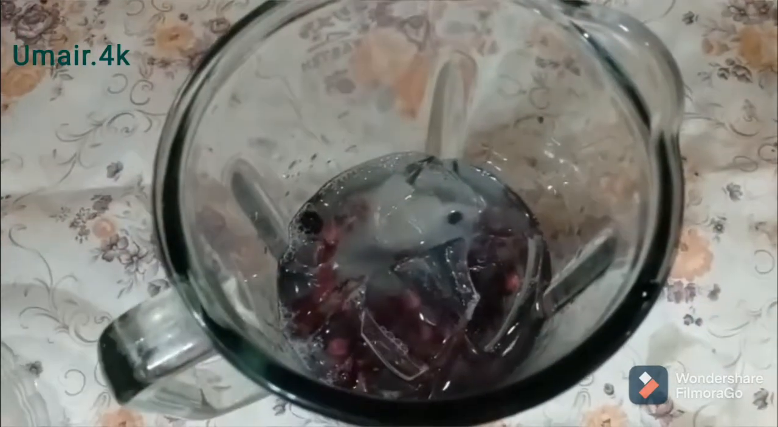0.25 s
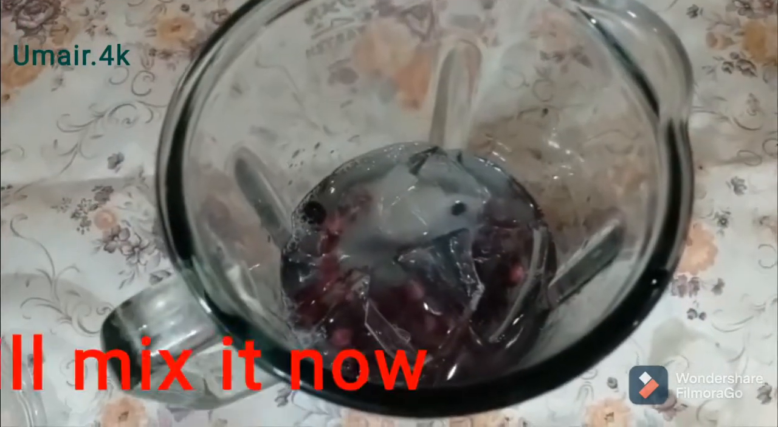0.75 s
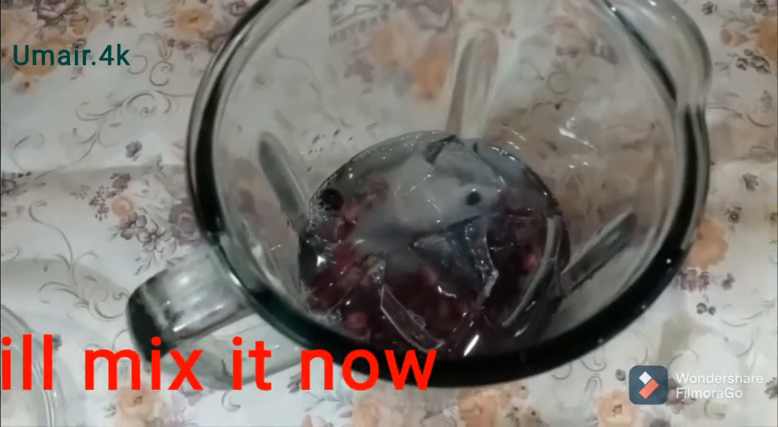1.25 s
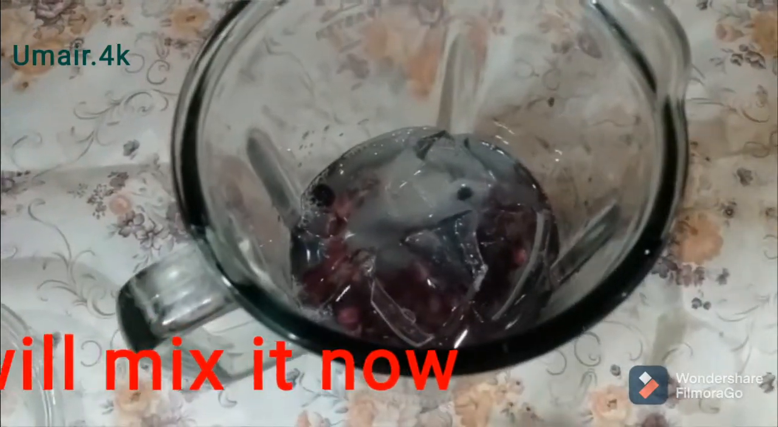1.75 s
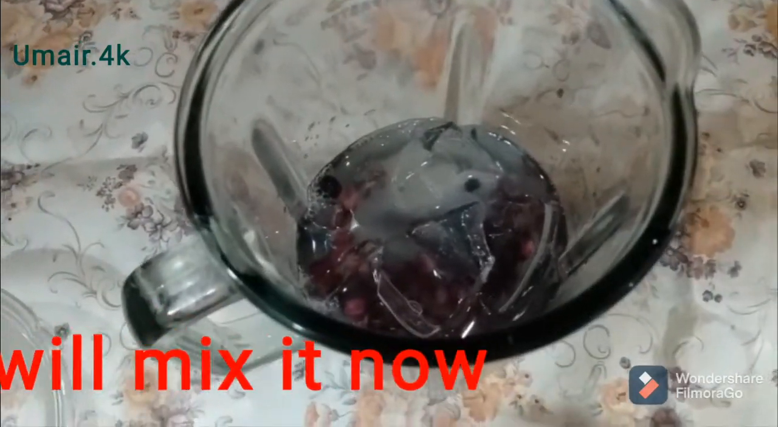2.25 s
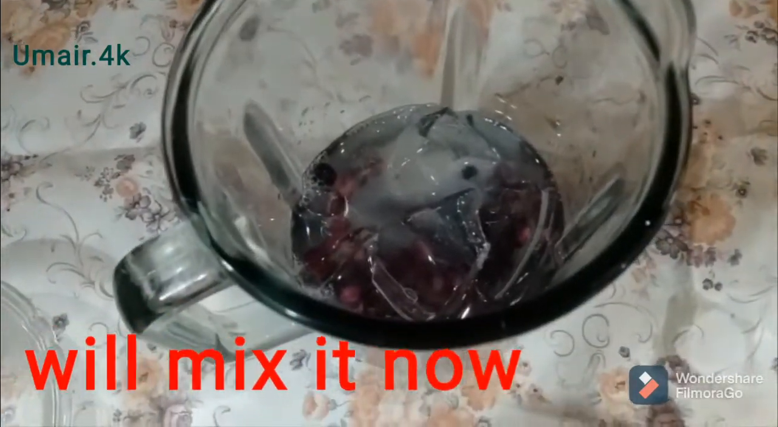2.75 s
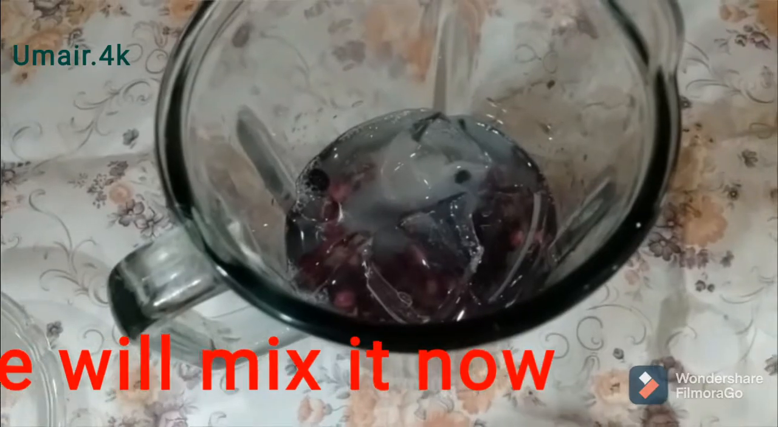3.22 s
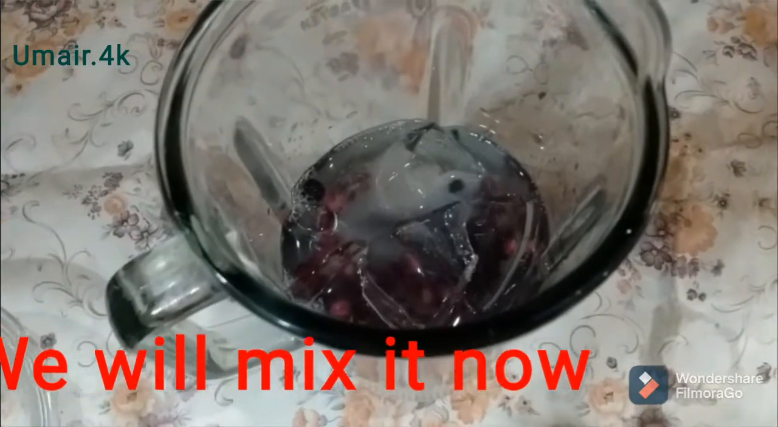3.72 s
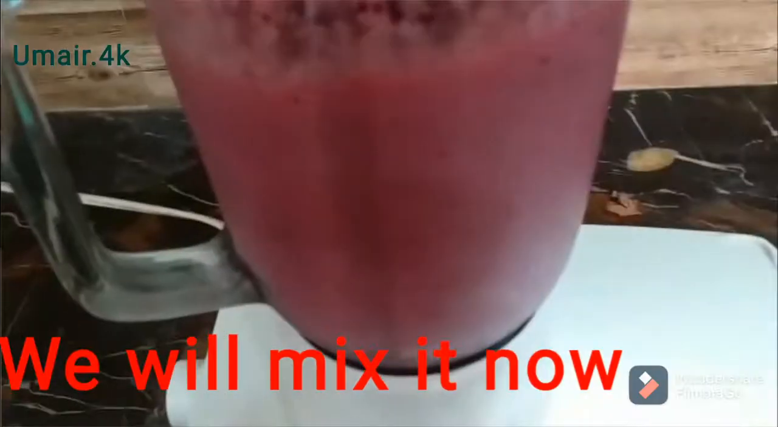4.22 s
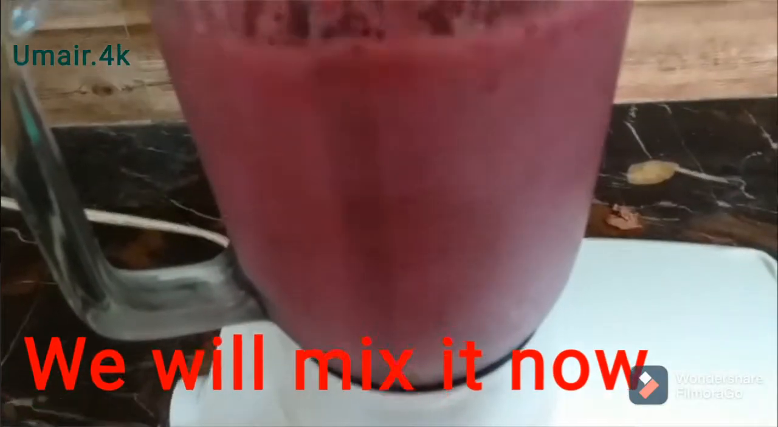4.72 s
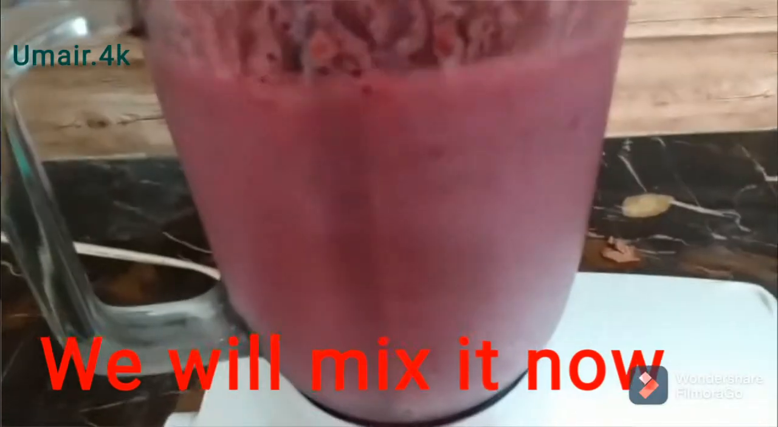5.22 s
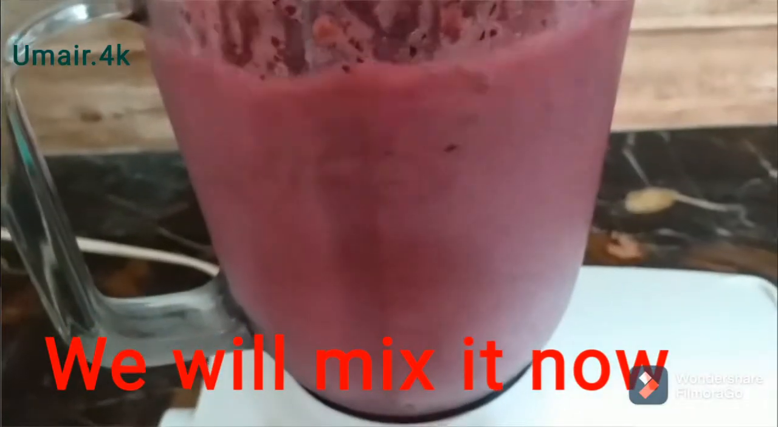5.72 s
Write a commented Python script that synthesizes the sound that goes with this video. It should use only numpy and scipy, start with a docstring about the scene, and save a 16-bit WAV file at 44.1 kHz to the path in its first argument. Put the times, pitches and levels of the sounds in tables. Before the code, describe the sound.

A quiet kitchen with faint distant bird chirps, then an electric blender suddenly runs at full speed, rattling ice and churning fruit.

```python
"""A quiet kitchen hums; over it come a distant bird, two soft bumps, a faint squeak and a brief high hiss.
After a blink of silence a glass-jar blender is running close by at full speed. Its motor hums on the
shaft orders and sags as gulps of pulp fall on the blades. Bits of ice and fruit rattle against the
ringing jar, the pulp heaves in the bass and the jar throbs on its base."""
import sys
import numpy as np
from scipy import signal
from scipy.fft import rfft, irfft, next_fast_len
from scipy.io import wavfile

SR = 44100
rng = np.random.default_rng(int(sys.argv[2]) if len(sys.argv) > 2 else 0)


def transcribe(signal):
    """Save signal, clipped to [-1, 1], as a 16-bit WAV file at the path in sys.argv[1]."""
    frames = np.atleast_2d(signal).T
    limited = np.clip(frames, -1, 1)
    pcm = np.round(limited * 32767).astype(np.int16)
    wavfile.write(sys.argv[1], SR, pcm)


N = 263277
T = np.arange(N) / SR


def undb(db):
    """Decibels to gain."""
    return 10 ** (np.asarray(db) / 20)


def level(x, db):
    """Scale to an rms level."""
    return x * undb(db) / np.sqrt(np.mean(x ** 2))


def peak_level(x, db):
    """Scale to a peak level."""
    return x * undb(db) / np.abs(x).max()


def ramp(start_s, length_s):
    """An envelope that rises from 0 to 1 and stays there."""
    return np.clip((T - start_s) / length_s, 0, 1)


def burst(start_s, decay_s):
    """An envelope that jumps to 1 and dies away."""
    return (T >= start_s) * np.exp(-np.maximum(T - start_s, 0) / decay_s)


def walk(rate):
    """Smooth random drift of unit rms, changing about rate times a second."""
    size = next_fast_len(N, real=True)
    f = np.arange(size // 2 + 1) * SR / size
    spectrum = rfft(rng.standard_normal(size)) * np.exp(-(f / rate) ** 2)
    return level(irfft(spectrum, size)[:N], 0)


def tone(cycles, db):
    """A sine at an rms level, its phase counted in cycles."""
    return np.sqrt(2) * undb(db) * np.sin(2 * np.pi * cycles)


def cut(x, kind, hz, order):
    """Butterworth low-pass or high-pass."""
    return signal.sosfilt(signal.butter(order, hz, kind, fs=SR, output="sos"), x)


def through(x, response):
    """Pass a sound through an impulse response."""
    return signal.fftconvolve(x, response)[:N]


def colour(points, resonances=(), size=SR // 2):
    """Impulse response of an EQ curve (frequency [Hz], gain [dB]) with resonances standing on it."""
    hz, db = np.transpose(points)
    f = np.maximum(np.arange(size // 2 + 1) * SR / size, 1)
    peaks_db = sum(lift / (1 + (2 * (f - centre) / width) ** 2) for centre, width, lift in resonances)
    curve_db = np.interp(np.log(f), np.log(hz), db)
    cepstrum = irfft(np.log(undb(curve_db + peaks_db)))
    # minimum phase: nothing rings ahead of the hit
    cepstrum[1:size // 2] *= 2
    cepstrum[size // 2 + 1:] = 0
    return irfft(np.exp(rfft(cepstrum)))


def noise(points):
    """Noise of unit rms, shaped by an EQ curve."""
    return level(through(rng.standard_normal(N), colour(points)), 0)


def ring(modes):
    """Impulse response of damped modes: the narrower the mode, the longer it rings."""
    t = T[:SR // 2]
    return sum(undb(db) * 2 * np.pi * width / SR * np.exp(-np.pi * width * t) * np.sin(2 * np.pi * hz * t)
               for hz, width, db in modes)


def kitchen(x, t60_s, wet_db):
    """Direct sound plus a short tail from worktop and walls."""
    t = T[:SR // 2]
    tail = rng.standard_normal(len(t)) * np.exp(-np.log(1000) * t / t60_s) * (t > .002)
    return x + undb(wet_db) * through(x, tail / np.linalg.norm(tail))


def room_tone():
    """The bed: an even rush with a mains hum, a thin whine and a sinking upper hiss."""
    # spectrum of the rush (frequency [Hz], relative level [dB])
    rush_eq = [(30, -19), (50, -14), (80, 4), (100, 0), (125, -3.5), (165, -0.5), (215, -8.5), (310, -4.5),
               (570, -6.5), (900, -11.5), (1500, -13), (3400, -24), (5200, -50.5), (6700, -51.5),
               (9000, -53.5), (15500, -45.5)]
    # fade of the upper hiss (time [s], level [dB])
    air_fade = [(0, -61), (3.2, -64), (3.5, -68)]
    # hum and whine (frequency [Hz], level [dB])
    steady_tones = [(99.3, -52), (4126.6, -74)]
    rush = noise(rush_eq) * undb(-43)
    air_db = np.interp(T, *np.transpose(air_fade))
    air = noise([(2500, -11), (4200, 6.5), (5100, -1), (6300, -26), (8000, -56)]) * undb(air_db)
    return rush + air + sum(tone(hz * T, db + 2 * walk(5)) for hz, db in steady_tones)


def hiss(rise_s=0.059, fall_s=0.041):
    """A faint, very high hiss that flutters as it swells and fades a few times."""
    # swells (time of the peak [s], level [dB])
    swells = [(.54, -64), (2.4, -78), (2.79, -52), (3.5, -78)]
    envelope = sum(undb(db) * np.exp(-np.maximum((s - T) / rise_s, (T - s) / fall_s)) for s, db in swells)
    return noise([(5000, -30), (9500, -26), (12500, -7), (15000, 2)]) * envelope * undb(2 * walk(60))


def bird(length_s=0.055, from_hz=4450, to_hz=5100, rasp_hz=857, clear_db=-64, hoarse_db=-54.5):
    """A small bird outside: rising chirps whose pitch shakes more when loud, dulled by the window."""
    # chirps (time [s], level outside the window [dB])
    chirps = [(.071, -61), (0.281, -54.5), (0.495, -51), (0.715, -55), (.908, -55.5), (1.13, -63),
              (1.371, -60.5), (1.62, -63), (1.87, -60.5), (2.11, -64)]
    out, shake = np.zeros(N), walk(760)
    progress = np.linspace(0, 1, int(length_s * SR))
    arch = np.sqrt(np.abs(np.sin(np.pi * progress)))
    for s, db in chirps:
        span = slice(int(s * SR), int(s * SR) + len(progress))
        hoarseness = np.interp(db, [clear_db, hoarse_db], [.1, 1])
        hz = from_hz + (to_hz - from_hz) * progress + hoarseness * rasp_hz * shake[span]
        out[span] += arch * tone(np.cumsum(hz) / SR, db)
    return kitchen(cut(out, "low", 4920, order=6), t60_s=0.32, wet_db=-2)


def squeak(start_s=.728, decay_s=0.06, attack_s=0.0064):
    """A faint, rough squeak: noise ringing in narrow modes, quick to swell and fade."""
    # resonances of the squeak (frequency [Hz], width [Hz], relative level [dB])
    modes = [(663, 8.9, 4), (1350, 54, -12), (1995, 55, -8), (2623, 55, -5.5)]
    rasp = cut(through(rng.standard_normal(N), ring(modes)), "low", 2900, order=6)
    return level(rasp, -38.5) * (burst(start_s, decay_s) - burst(start_s, attack_s))


def bumps(rebounds=3, rebound_hz=118, rebound_db=-3):
    """Handling bumps with dull, ever weaker rebounds; a softer contact reaches fewer high modes."""
    # knocks (time [s], relative push [dB], brightness [Hz], gap between rebounds [s])
    knocks = [(.181, -24, 1300, .041), (0.51, -25, 278, 0.05)]
    # resonances of the bumped body (frequency [Hz], width [Hz], relative level [dB])
    modes = [(61, 4.7, 4), (78.7, 8.2, 13.5), (103, 14, 5), (161, 28, -2), (210, 99, -3.5), (401, 17, -5),
             (551, 35, -0.5), (940, 55, -10), (1000, 55, -6.5), (1120, 130, -22)]
    force = np.zeros(N)
    for s, db, bright_hz, gap_s in knocks:
        for k in range(rebounds + 1):
            push = np.zeros(N)
            push[int((s + k * gap_s) * SR)] = undb(db + k * rebound_db)
            force += cut(push, "low", rebound_hz if k else bright_hz, order=2)
    return kitchen(through(force, peak_level(ring(modes), 7)), t60_s=0.21, wet_db=1.0)


def pulp_load(attack_s=.025, release_s=.04):
    """The vortex collapses and pulp falls on the blades: each gulp builds, holds and drains away."""
    # gulps (time [s], length [s], strength [0-1])
    gulps = [(3.92, 0.045, 0.6), (4.19, 0.043, 0.77), (4.357, .05, 0.74), (4.62, 0.052, .9),
             (4.705, 0.064, 0.65), (4.892, 0.076, 0.77), (5.115, 0.053, 1), (5.325, .07, 0.7),
             (5.599, 0.1, 1), (5.76, 0.057, 1), (5.853, 0.067, 0.57)]
    return sum(strength * ramp(s, attack_s) * np.exp(-np.maximum(T - s - length, 0) / release_s)
               for s, length, strength in gulps)


def whine(hz=1192, db=-38.5):
    """An unsteady whine just under the motor's sixth order."""
    cycles = np.cumsum(hz + 8 * walk(14.8)) / SR
    return tone(cycles, db + 2 * walk(14))


def rocking(load, hz=149.8, wander_hz=8.85, throb_hz=15.0, throb_depth=0.59):
    """The jar shakes on its base: a low, throbbing drone that wanders and grows a little under load."""
    cycles = np.cumsum(hz + wander_hz * walk(31.9)) / SR
    throb_cycles = np.cumsum(throb_hz * (1 + 0.146 * walk(4.7))) / SR
    throb = 1 + throb_depth * np.sin(2 * np.pi * throb_cycles)
    return throb * tone(cycles, -32 + 0.5 * load + 1.4 * walk(9.8))


def motor(turns, waver_db=2.0):
    """The motor hums at multiples of its shaft speed, each wavering in level on its own."""
    # partials of the hum (shaft order [cycles per turn], level [dB])
    partials = [(1, -39), (2, -44), (3, -43), (4, -46), (6, -35.5), (9, -46), (12, -50.5)]
    hum = np.zeros(N)
    for order, db in partials:
        wavering_db = db + waver_db * walk(19)
        hum += tone(order * turns + rng.random(), wavering_db)
    return hum


def grit(turns, per_s, spread_db, bunching, surge_db):
    """Small random hits on the blades, surging in level and bunched at one point of each turn."""
    chance = per_s / SR * (1 + bunching * np.cos(2 * np.pi * turns))
    size = undb(spread_db * np.minimum(rng.exponential(size=N), 4)) * rng.choice([-1, 1], N)
    hits = rng.random(N) < chance
    return level(hits * size * undb(surge_db * walk(57)), 0)


def slosh(turns, load, rest_db=-36, lift_db=8.5):
    """The vortex slaps the pulp about: a bass heave that swells with each gulp."""
    # spectrum of the heaving pulp (frequency [Hz], relative level [dB])
    pulp_eq = [(35, -59), (60, -4), (90, -5), (125, 2), (185, 0), (240, 4), (330, 1), (450, -6.5),
               (800, -17), (2000, -60)]
    slaps = grit(turns, per_s=900, spread_db=5.0, bunching=.2, surge_db=0.5)
    return level(through(slaps, colour(pulp_eq)), 0) * undb(rest_db + lift_db * load)


def ice_chunks(jar, crumble_s=0.0067, shards_s=0.026, click_db=-23, scatter_db=3):
    """Each chunk crumbles into a brief shower of shards, rings the jar and clicks on the glass."""
    # blade strikes on ice (time [s], peak before the low cut [dB])
    strikes = [(3.9848, -10), (4.0841, -13), (4.1126, -10), (4.2298, -6), (4.2732, -10), (4.3206, -8),
               (4.3565, -7), (4.3974, -9), (4.4643, -8), (4.5845, -12), (4.6364, -11), (4.6754, -11),
               (4.7157, -9), (4.7631, -9), (4.7875, -5), (4.8744, -10), (4.9427, -8), (4.9884, -8),
               (5.0414, -10), (5.1367, -5), (5.1524, -9), (5.1716, -6), (5.2689, -9), (5.4166, -7),
               (5.5223, -9), (5.5474, -10), (5.5967, -7), (5.6221, -10), (5.672, -10), (5.7024, -6),
               (5.7683, -9), (5.8501, -7), (5.9344, -9)]
    glass = colour([(3000, -27), (9000, -14), (12000, -3), (15000, 20)])
    out, t = np.zeros(N + SR), T[:SR // 10]
    for s, db in strikes:
        crumble = rng.standard_normal(len(t)) * np.exp(-t / crumble_s)
        shards = rng.standard_normal(len(t)) * np.exp(-t / shards_s) * undb(-14.5)
        knock = peak_level(signal.fftconvolve(crumble + shards, jar), db)
        knock = cut(knock, "high", 1310, order=1)  # hard, light ice hardly moves the low modes
        click = signal.fftconvolve(crumble * np.abs(crumble), glass)  # the hardest contacts click most
        click = peak_level(click, db + click_db + scatter_db * rng.standard_normal())
        start = int(s * SR)
        out[start:start + len(knock)] += knock + click
    return out[:N]


def rattle(turns, drive_db):
    """Countless bits and a few ice chunks ring the jar; seeds tick against the glass between them."""
    # dry crack of a bit on blade or glass (frequency [Hz], relative level [dB])
    crack_eq = [(60, -60), (200, 2), (420, 3), (700, 5.5), (1050, 2.5), (1400, 5), (2100, 8.5), (2650, 3),
                (3200, -3), (4100, 1), (5900, -10.5), (6600, -20), (8700, -33), (15600, -13)]
    # ringing resonances of the jar, plus a slight peak near the whine's pitch
    # (frequency [Hz], width [Hz], lift [dB])
    mid_peaks = [(803, 14, 5), (835, 18, 7), (1177, 20, 3), (1526, 26, 6), (1672, 70, 7), (1890, 70, 12),
                 (1962, 50, 9.5), (2177, 40, 5), (2305, 25, 3), (2443, 40, 8)]
    # treble resonances of the bare glass wall (frequency [Hz], width [Hz], lift [dB])
    glass_modes = [(3555, 310, 6.5), (3795, 65, 5.5), (4230, 23, 2.5), (4300, 22, -5), (4610, 30, 4),
                   (5170, 50, 4.5), (5800, 160, 7), (8370, 160, 5.5)]
    jar = colour(crack_eq, mid_peaks + glass_modes)
    jar /= np.linalg.norm(jar)
    tick = colour([(3000, -20), (7000, -21), (8300, -9), (9500, -9.5), (15000, -30)])
    bits = grit(turns, per_s=3800, spread_db=1, bunching=.2, surge_db=2) * undb(drive_db)
    seeds = grit(turns, per_s=90, spread_db=8, bunching=.29, surge_db=2) * undb(drive_db - 19.5)
    return through(bits, jar) + through(seeds, tick) + ice_chunks(jar)


def blender(free_hz=204.55, sag_hz=2.3, drag_hz=1.8, inertia_s=0.088):
    """Gulps of pulp slow the motor, push up the rattle in the jar and heave in the bass."""
    load = pulp_load()
    grip = ramp(4.14, 0.014)  # the blades catch the fruit
    drag = ramp(5.63, 0.21)  # the mix drags on the shaft
    sag = cut(load, "low", 1 / (2 * np.pi * inertia_s), order=1)
    shaft_hz = free_hz - sag_hz * sag - drag_hz * drag
    turns = np.cumsum(shaft_hz * (1 + .0042 * walk(30))) / SR
    contents = rattle(turns, drive_db=-27 + 3 * grip + 2 * load) + slosh(turns, load)
    churn = kitchen(contents, t60_s=0.21, wet_db=-9.5)
    return churn + grip * rocking(load) + motor(turns) + drag * whine()


def scene(room_ends_s=3.948, blender_starts_s=3.979):
    """The quiet room, a blink of silence, then the running blender."""
    quiet = room_tone() + bumps() + bird() + squeak() + hiss()
    return (quiet * (T < room_ends_s) + blender() * (T >= blender_starts_s))[None]


def record(dry):
    """Roll off the deep bass and cut the very top steeply."""
    top_cut = signal.ellip(12, .2, 80, 15800, fs=SR, output="sos")
    return signal.sosfilt(top_cut, cut(dry, "high", 40, order=4))


dry = scene()
out = record(dry)
transcribe(out)
```